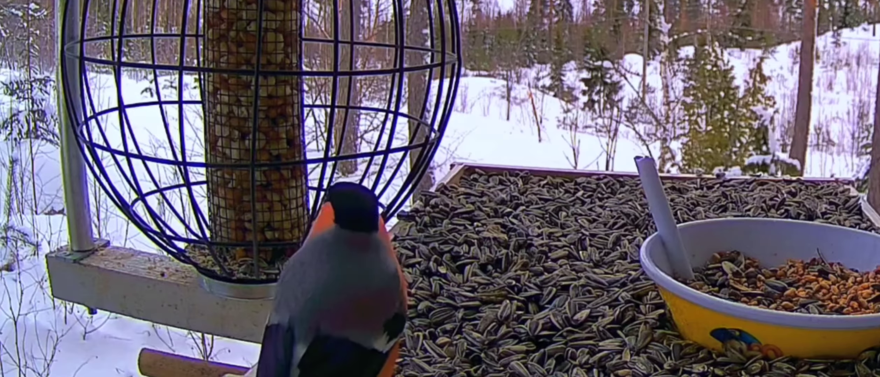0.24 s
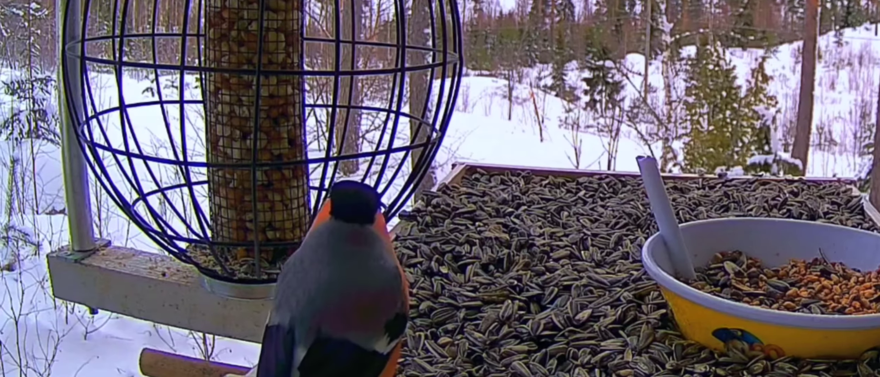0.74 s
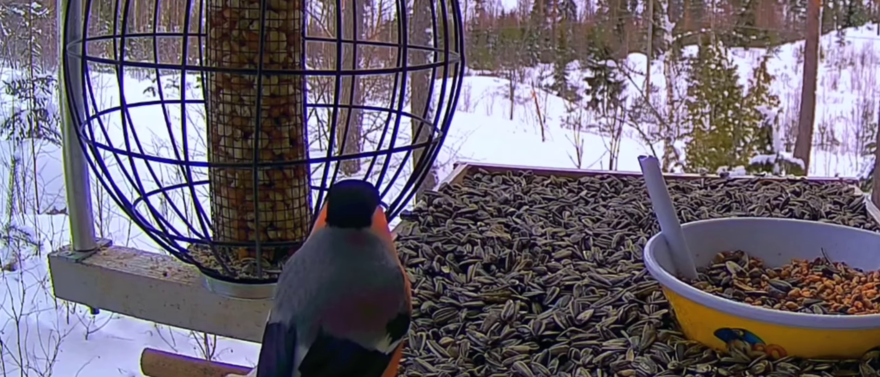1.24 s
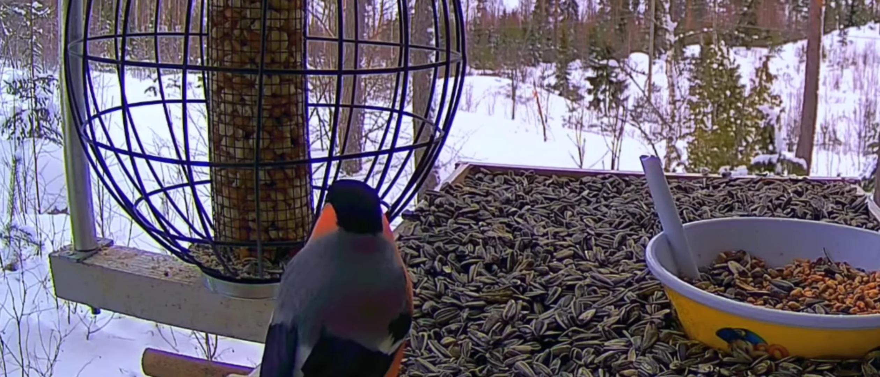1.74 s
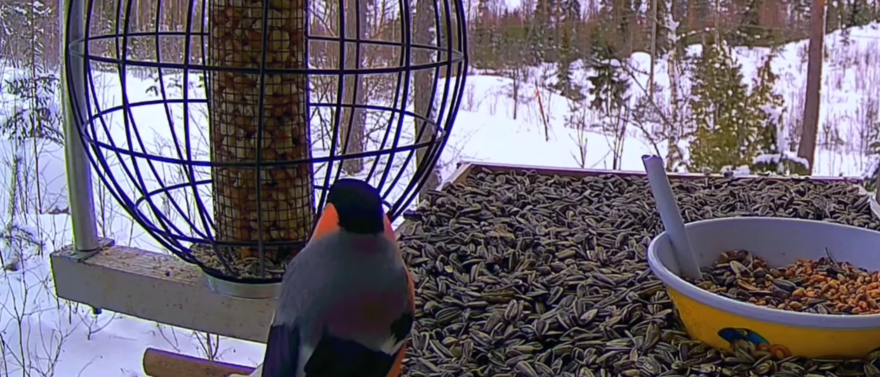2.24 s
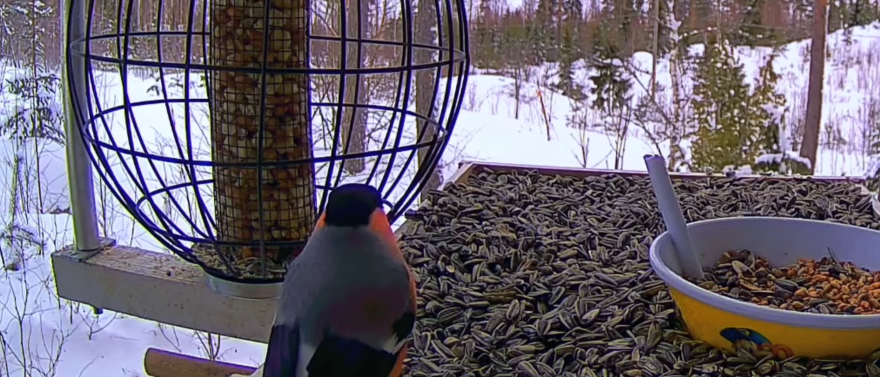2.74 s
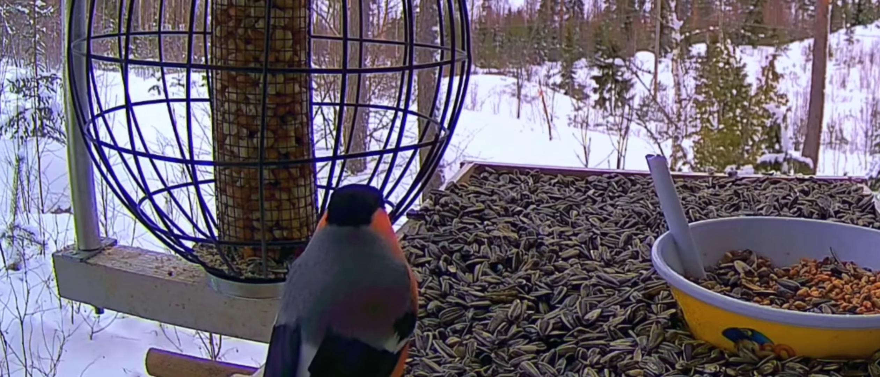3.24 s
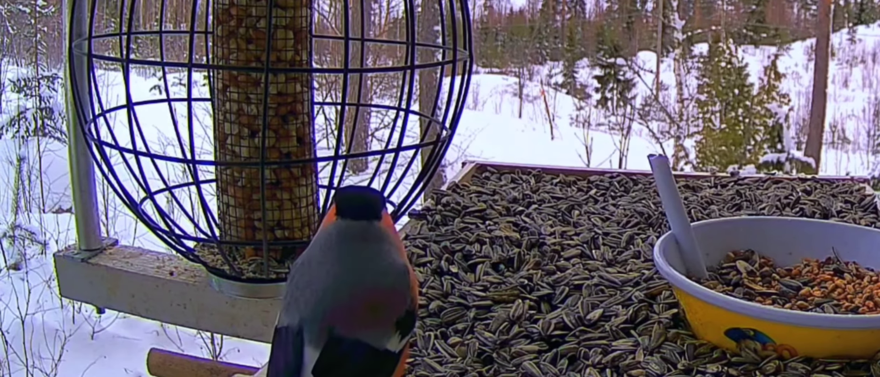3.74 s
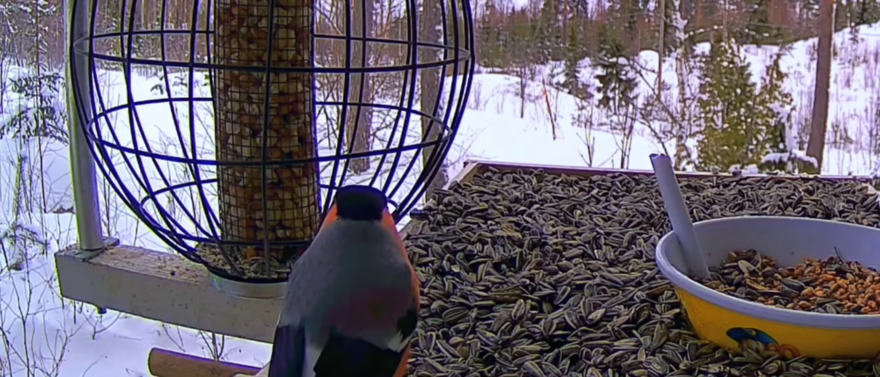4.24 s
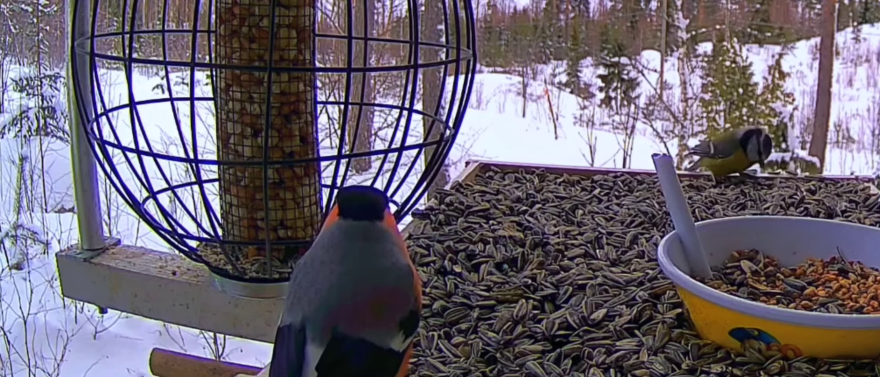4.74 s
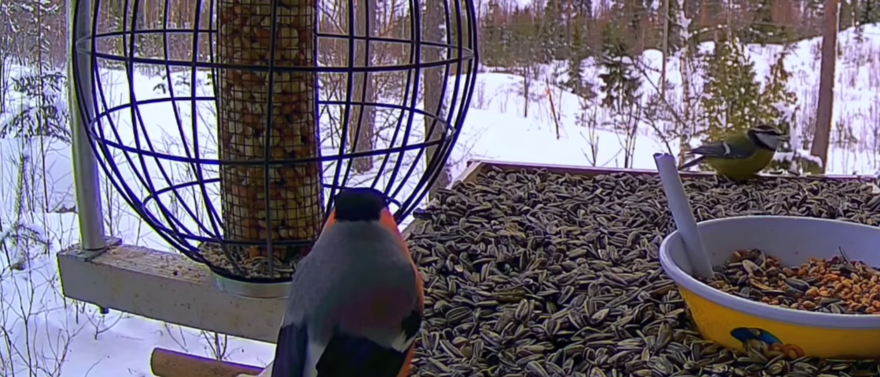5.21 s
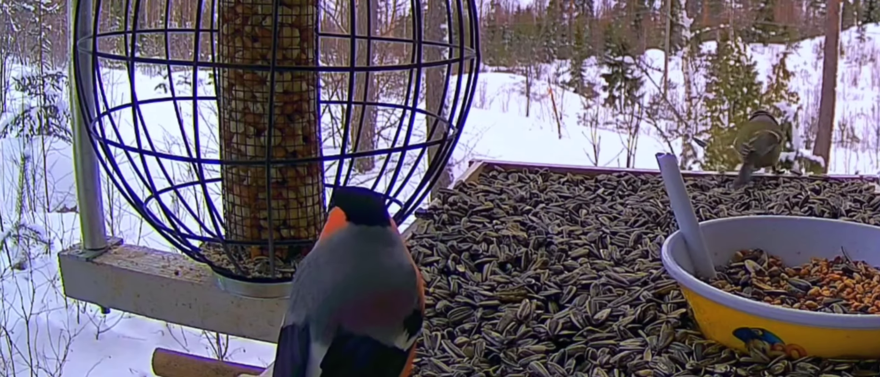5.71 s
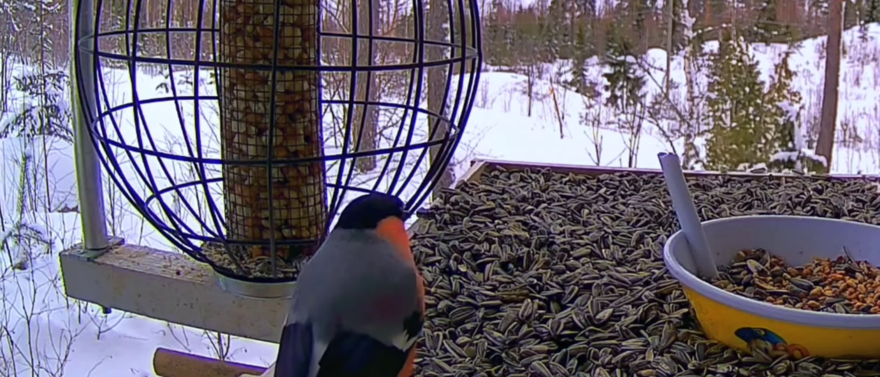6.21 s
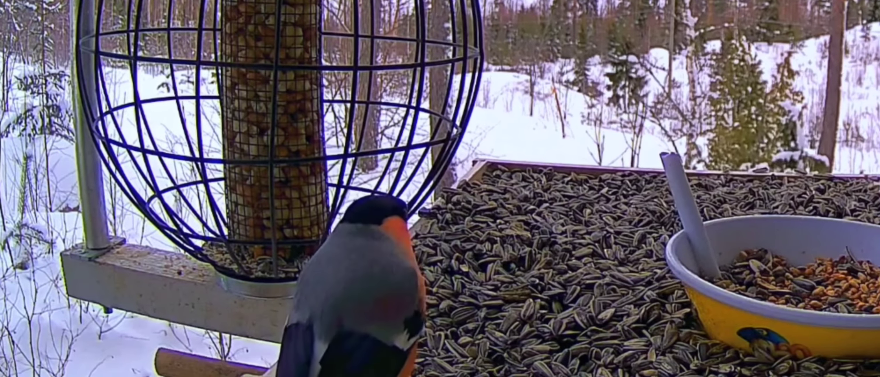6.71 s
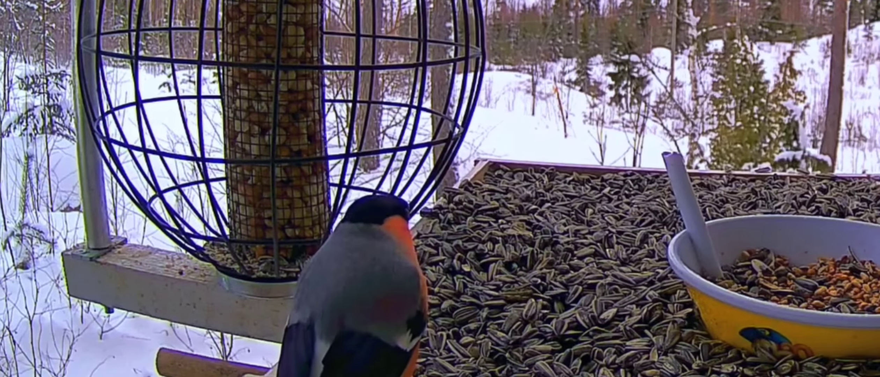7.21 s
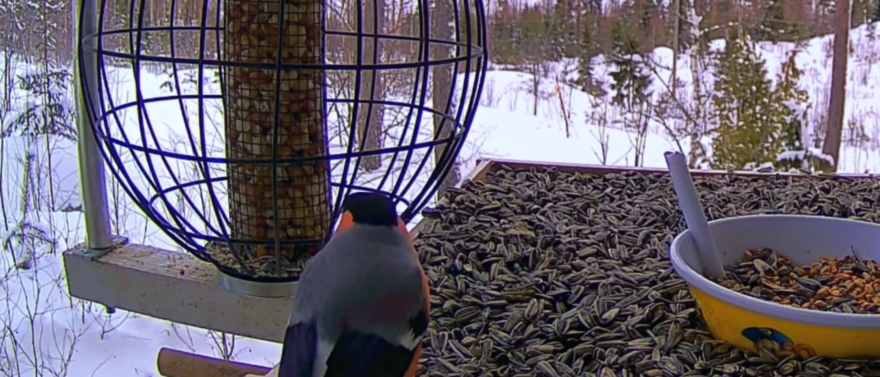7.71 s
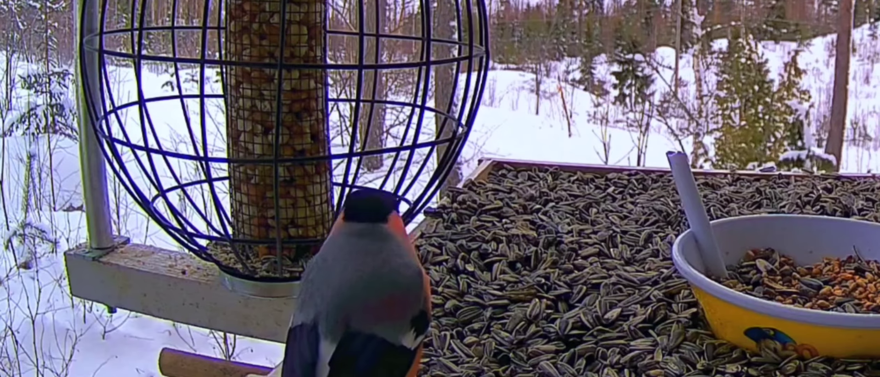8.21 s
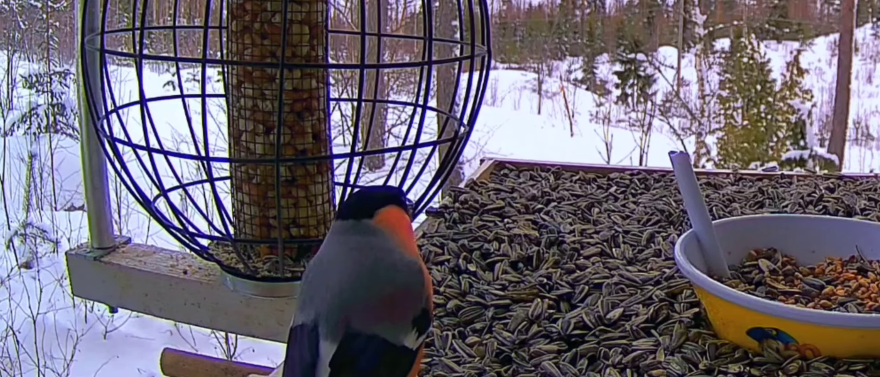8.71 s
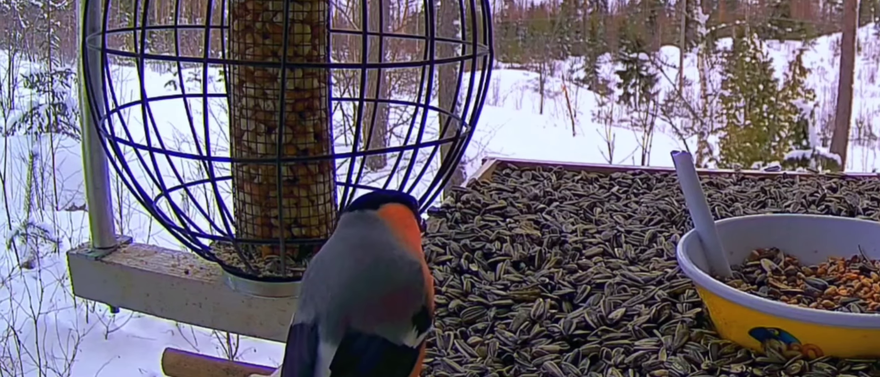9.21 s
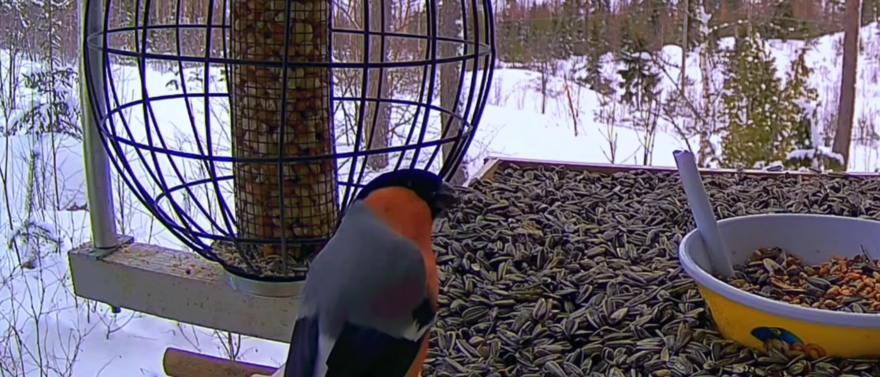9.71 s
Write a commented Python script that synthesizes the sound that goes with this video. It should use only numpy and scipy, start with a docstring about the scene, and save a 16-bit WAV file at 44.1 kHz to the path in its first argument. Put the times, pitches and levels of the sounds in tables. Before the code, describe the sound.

Close at a winter feeding tray, a burst of wing flutter fades into dry seed cracks and tiny ticks. Around three seconds a bird lands with rustling husks and a thin metallic rattle of the wire cage. Sharp snaps follow, another bird scuffs in at five seconds and flutters away after six. Brief high peeps dot the quiet air, heard by a boxy outdoor microphone.

```python
"""Wings flutter over a quiet floor of air and a far, wavering hum, then a beak cracks seeds.
Small birds at a winter feeding tray call, land, stir the husks, knock the wire cage and flutter off,
heard by a boxed-in outdoor microphone. Cracks, wings, husks and air are shaped noise, calls are
gliding sines and the cage is a set of decaying sines; a soft echo follows cracks, calls and cage."""
import sys
import numpy as np
from scipy import signal
from scipy.fft import rfft, irfft, next_fast_len
from scipy.io import wavfile
from scipy.ndimage import uniform_filter1d

SR = 44100
rng = np.random.default_rng(int(sys.argv[2]) if len(sys.argv) > 2 else 0)


def digitize_waveform(pressure):
    """Quantize a signal to 16-bit integers and store it at the path in sys.argv[1].

    Rows of a 2-D input are taken as channels; values are limited to [-1, 1].
    """
    field = np.atleast_2d(pressure).T
    bounded = np.clip(field, -1, 1)
    quanta = np.round(bounded * 32767).astype(np.int16)
    wavfile.write(sys.argv[1], SR, quanta)


N = 438794

# Spectrum of air pushed by wings. Each row: frequency in Hz, relative density in dB per Hz.
WING_SPECTRUM = [(71, -44), (120, -7), (150, -7), (200, -11), (307, -10), (418, 2.5), (494, -3.5),
                 (905, -3.5), (1060, -4.5), (1310, -1.5), (1720, -17.5), (2600, -8.5), (3380, -41),
                 (5720, -120)]
# Spectrum of rustling husks. Each row: frequency in Hz, relative density in dB per Hz.
HUSK_SPECTRUM = [(590, -36), (1000, -76), (1300, 3.5), (1600, -23.5), (2250, -7), (2890, -13), (3150, -3),
                 (4080, -12), (4450, 7.5), (6180, -25.5), (7140, -6), (8090, -14.5), (8410, -61),
                 (9170, -24), (10000, -43), (13000, -57), (22000, -120)]


def amp(db):
    """Turns dB into gain."""
    return 10 ** (np.asarray(db) / 20)


def evened(x):
    """Scales to rms 1."""
    return x / np.sqrt(np.mean(x ** 2) + 1e-20)


def curve(rows):
    """Draws the columns of a time table, sample by sample."""
    s, *columns = np.transpose(rows)
    return [np.interp(np.arange(N) / SR, s, column) for column in columns]


def add(mix, s, sound):
    """Mixes a sound in at s seconds."""
    part = mix[round(s * SR):][:len(sound)]
    part += sound[:len(part)]


def colour(x, points):
    """Shapes x by a spectrum, silent outside its ends."""
    size = next_fast_len(len(x))
    hz, db = np.transpose(points)
    bins_hz = np.fft.rfftfreq(size, 1 / SR)
    gain_db = np.interp(np.log(bins_hz + 1), np.log(hz + 1), db, -150, -150)
    return irfft(rfft(x, size) * amp(gain_db), size)[:len(x)]


def wander(per_s):
    """Drifts at random through per_s points a second, at rms 1."""
    steps = rng.standard_normal(int(N / SR * per_s) + 2)
    return evened(np.interp(np.arange(N) * per_s / SR, np.arange(len(steps)), steps))


def air():
    """Quiet air through the box's resonances, a flickering top hiss and three wavering low tones."""
    # Air below and above about 2.2 kHz. Each row: frequency in Hz, relative density in dB per Hz.
    low_spectrum = [(8.8, -41), (15, -10), (75, -3.5), (140, -3), (329, -3.5), (441, -3), (510, -36.5),
                    (616, -5.5), (955, -1), (1080, -15), (1310, 0.5), (1580, -22), (1750, -14), (1940, -3),
                    (2200, -12.5), (2860, -51), (4840, -120)]
    high_spectrum = [(1290, -49), (2200, -13), (2740, -3.5), (2970, -12.5), (3620, 0), (4510, 3),
                     (5140, -16), (5710, -8.5), (6150, -23.5), (6720, -4.5), (7120, -4.5), (8310, -27),
                     (9310, -5.5), (10500, -31), (15400, -34)]
    # A thin hiss at the very top comes and goes. Each row: start in seconds, end in seconds, level in dB.
    top_spells = [(0.7, 1.3, -67), (2.75, 3.36, -68), (4.7, 5.13, -67), (6.52, 6.75, -68),
                  (7.05, 7.61, -67), (8.1, 8.65, -68)]
    # Far hum near 97 Hz. Each row: time in seconds, level in dB before flicker.
    hum_levels = [(0.0, -72), (0.25, -62), (1.8, -70), (1.85, -60), (2.08, -68), (4.68, -65), (4.82, -79),
                  (5.04, -64), (6.12, -67), (6.18, -61), (7.26, -63), (7.32, -78), (7.4, -71), (8.29, -59),
                  (9.81, -61), (9.95, -71)]
    low_db, high_db = -57, -55.5
    top_rest_db, top_fade_s = -74, .05

    low = amp(low_db + 1.4 * wander(3)) * evened(colour(rng.standard_normal(N), low_spectrum))
    high = amp(high_db + 1.16 * wander(30)) * evened(colour(rng.standard_normal(N), high_spectrum))

    top_spectrum = [(9800, 1), (10300, -2), (11500, -8), (12500, -4), (15800, -7)]  # Hz, relative dB
    top = evened(colour(rng.standard_normal(N), top_spectrum))
    t = np.arange(N) / SR
    top_db = np.full(N, float(top_rest_db))
    for start, end, db in top_spells:
        presence = np.clip(np.minimum(t - start, end - t) / top_fade_s + .5, 0, 1)
        top_db += (db - top_rest_db) * presence
    out = low + high + amp(top_db + 2.3 * wander(40) + 1.4 * wander(130)) * top

    # each tone: level in dB, centre in Hz, rms pitch waver in Hz, rms flicker in dB
    tones = [(curve(hum_levels)[0], 96.5, 3.2, 4.0),
             (-68.5 + 1.6 * wander(4), 40.3, 1.5, 1.5),
             (-72.5 + 1.6 * wander(5), 193.5, 3.0, 3.0)]
    for db, hz, waver_hz, flicker_db in tones:
        turn = 2 * np.pi * np.cumsum(hz + waver_hz * wander(21)) / SR
        out += np.sqrt(2) * amp(db + flicker_db * wander(45)) * np.sin(turn)
    return out


def bustle():
    """Levels of wing and husk noise: the bouts rise and fade over a calm level, adding as power."""
    # Bouts of bustle; the one at 4.07 s is a brief swell of noise around a crack.
    # Each row: height in seconds, seconds to gain 10 dB, seconds to lose 10 dB,
    # level of wing-coloured noise in dB, level of husk-coloured noise in dB.
    bouts = [(0.01, .02, .75, -42.5, -48), (0.95, .15, .05, -50, -47), (1.07, .06, .5, -50, -48),
             (2.1, .2, .5, -57, -56), (2.74, .08, .06, -53, -43), (2.85, .04, .1, -53, -47),
             (2.99, .05, .08, -47, -40), (3.1, .03, .05, -45, -52), (3.17, .05, .2, -47, -49),
             (4.07, .05, .04, -65, -42), (4.22, .15, .1, -65, -53), (4.9, .1, .5, -53, -52),
             (4.93, .04, .12, -58, -43), (5.02, .06, .03, -56, -45), (5.75, .4, .6, -55.5, -53),
             (6.15, .04, .1, -54, -49), (6.34, .04, .45, -45, -47), (6.79, .15, .2, -51, -49),
             (7.67, .3, .4, -58, -56), (9.5, .6, .3, -65, -58)]
    calm_db = (-54.3, -67)  # wings, husks
    t = np.arange(0, N / SR + .01, .005)
    power = amp(calm_db)[:, None] ** 2
    for s, rise, fade, *db in bouts:
        drop_db = 10 * np.maximum((s - t) / rise, (t - s) / fade)
        power = power + amp(np.array(db)[:, None] - drop_db) ** 2
    return curve(np.c_[t, np.sqrt(power).T])


def stir():
    """Wings throb with each downstroke; husks rustle as dense small grains."""
    beats_per_s, grains_per_s = 28, 1800  # on average
    wings_gain, husks_gain = bustle()
    strokes = np.cumsum(beats_per_s * (1 + 0.1026 * wander(3))) / SR
    throb = amp(1.33 * np.cos(2 * np.pi * strokes))
    wings = evened(colour(rng.standard_normal(N), WING_SPECTRUM) * throb)

    sizes = amp(1.8 * np.minimum(rng.exponential(1, N), 5))
    grains = sizes * (rng.random(N) < grains_per_s / SR) * rng.standard_normal(N)
    # each grain scrapes for about a millisecond
    scrapes = signal.lfilter([1], [1, -.97], abs(grains)) * rng.standard_normal(N)
    husks = evened(colour(scrapes, HUSK_SPECTRUM))
    return wings_gain * wings + husks_gain * husks


def causal(gain):
    """Adds the phase that makes a filter ring only after it is struck."""
    log = np.log(np.concatenate([gain, gain[-2:0:-1]]) + 1e-4)
    return np.exp(log - 1j * signal.hilbert(log).imag)[:len(gain)]


def snaps():
    """Cracks, scuffs, random nibbles and bright tops as (s, peak dB of four parts, ms to the burst's height)."""
    # Beak cracks and claw taps. Each row: time in seconds, peak near 4.5 kHz in dB,
    # peak of the dull part in dB, peak near 7 kHz in dB.
    crack_hits = [(0.1328, -39, -27, -32), (0.142, -21.5, -26, -28), (0.2198, -32, -45, -52),
                  (0.2464, -31, -47, -46), (0.253, -22, -45, -27.5), (0.3275, -25, -27.5, -28),
                  (0.84, -34, -36, -52), (0.906, -38, -51, -38), (0.9148, -24, -42, -27),
                  (0.9249, -16.5, -32, -20.5), (0.9493, -23, -36, -20), (1.0862, -12, -10, -12.5),
                  (1.1843, -28, -40, -31), (1.1974, -35, -48, -32), (1.726, -32, -54, -32.5),
                  (2.0803, -23.5, -32, -29.5), (2.1487, -43, -50, -35), (2.1575, -30, -54, -33),
                  (2.2257, -37, -52, -39), (2.3088, -18, -34, -24), (2.556, -31, -45, -36),
                  (2.65, -22.5, -48, -25.5), (2.7174, 0.1, -13, -11), (2.8385, -32, -36, -35),
                  (2.8802, -27, -48, -60), (3.441, -30, -37, -35), (3.7904, -13.5, -30, -10),
                  (4.07, -1.2, -11, 0.1), (4.1925, -40, -37, -56), (4.2624, -31, -35, -36.5),
                  (4.3898, -34.5, -53, -57), (4.538, -33.5, -50, -38), (4.9104, -13, -35, -23),
                  (5.296, -24, -49, -28.5), (5.7502, -46, -33.5, -40), (5.806, -40, -36, -56),
                  (5.913, -42, -40, -50), (5.9737, -50, -54, -34), (6.0036, -33, -53, -36),
                  (6.0436, -28, -48, -30), (6.0813, -27, -39, -27), (6.1197, -41, -29.5, -39),
                  (6.1887, -40, -47, -50), (6.2373, -28, -34, -45), (6.581, -34, -32, -48),
                  (6.6083, -42, -32, -57), (6.8228, -22, -43, -27), (6.894, -14.5, -27, -24.5),
                  (6.9943, -32, -51, -55), (7.5804, -31.5, -42, -50), (7.636, -29, -47, -49),
                  (7.645, -39, -28.5, -36), (7.687, -33, -39, -37), (8.6617, -35, -48, -50),
                  (8.8435, -23, -54, -25), (8.9615, -25, -36, -31.5), (9.0807, -24, -23.5, -27.5),
                  (9.336, -36.5, -48, -49), (9.3484, -44, -40, -39), (9.431, -36, -54, -58),
                  (9.476, -30, -43, -31), (9.5027, -27, -36, -29)]
    # Feet scuffing among husks, longer and duller than a crack.
    # Each row: time in seconds, peak near 4.5 kHz in dB, peak of the dull part in dB.
    scuff_hits = [(2.948, -29, -33), (2.9807, -21, -25), (3.0233, -38, -31), (4.865, -41, -36),
                  (4.9065, -16.5, -21.5), (4.9174, -35, -37), (4.9274, -32, -37), (4.9456, -23, -24),
                  (4.9594, -34, -45), (4.98, -38, -37), (4.999, -24, -27), (5.0159, -25, -31),
                  (5.025, -33, -44), (6.147, -35.5, -35), (6.3199, -32, -33), (6.336, -28, -39),
                  (6.3471, -25, -25), (6.3644, -35, -47), (7.621, -36, -45), (7.708, -48, -40),
                  (9.3182, -39, -46)]
    # Very bright top part of some loud snaps. Each row: time in seconds, peak above 8.4 kHz in dB.
    top_hits = [(0.9249, -52), (1.0862, -46), (2.7174, -14), (3.7904, -45), (4.07, -13), (4.9065, -38),
                (4.9104, -27)]
    crack_ms, ms_per_dull_db, shortest_ms = .6, .013, .3  # a duller crack lasts longer
    scuff_ms, scuff_high_db = 2.1, -18  # the part near 7 kHz against the one near 4.5 kHz
    top_ms, mute_db = 1.2, -150
    nibbles_per_s, nibble_db, nibble_spread_db = 2.5, (-42, -48, -50), 4

    draws = rng.random((40, 4))
    nibble_s = np.cumsum(-np.log(1 - draws[:, 0])) / nibbles_per_s  # faint cracks fall at random
    nibbles = np.c_[nibble_s, nibble_db + nibble_spread_db * (2 * draws[:, 1:] - 1)]

    rows = []
    for row in [*crack_hits, *nibbles]:
        ms = max(crack_ms + ms_per_dull_db * (row[2] - row[1]), shortest_ms)
        rows.append((*row, mute_db, ms))
    for s, db, dull_db in scuff_hits:
        rows.append((s, db, dull_db, db + scuff_high_db, mute_db, scuff_ms))
    for s, db in top_hits:
        rows.append((s, mute_db, mute_db, mute_db, db, top_ms))
    return rows


def cracks():
    """A husk snaps: a short noisy burst, heard in four parts of the box's resonances."""
    # Resonances that colour a snap. Each row: frequency in Hz, relative density in dB per Hz.
    resonances = [(900, -34), (1300, -33), (2100, -24), (3300, -4), (4470, 8.5), (4850, 4), (5500, -9),
                  (6100, -4), (7080, 7.5), (7700, -2), (8400, -34), (9540, -11), (10500, -26), (12000, -24),
                  (14200, -21), (15800, -27)]
    # The four parts: near 4.5 kHz, dull, near 7 kHz, top. Each row: lower edge in Hz, upper edge in Hz.
    part_edges = [(3700, 5700), (2000, 3600), (5700, 8400), (8400, 20000)]
    evenness = .6  # how strongly each burst's spectrum is flattened, 0 to 1

    out, t = np.zeros(N), np.arange(1024) / SR
    hz = np.fft.rfftfreq(2048, 1 / SR) + 1
    body_hz, body_db = np.transpose(resonances)
    body = amp(np.interp(np.log(hz), np.log(body_hz), body_db))
    parts = [causal(body / (1 + (lo / hz) ** 8) / (1 + (hz / hi) ** 8)) for lo, hi in part_edges]

    rows = snaps()
    for (s, *parts_db, ms), noise in zip(rows, rng.standard_normal((len(rows), len(t)))):
        u = t * 1000 / ms
        envelope = u * np.exp(-u) + 0.019 * np.exp(-t / .003)  # crumbs follow the snap
        burst = rfft(noise * envelope, 2048)
        burst = burst / uniform_filter1d(abs(burst), size=15) ** evenness
        for db, ring in zip(parts_db, parts):
            part = irfft(burst * ring)[:len(t)]
            add(out, s, amp(db) * part / abs(signal.hilbert(part)).max())
    return out


def whistle(start, length, first_hz, last_hz, db, loudest, bend):
    """One glide that swells to its loudest point and dies away, as (s, Hz, dB) rows."""
    ends_db = -14  # both ends against the loudest point
    u = np.linspace(0, 1, 12)
    distance = np.interp(u, [0, loudest, 1], [1, 0, 1]) ** 1.5
    pitch = first_hz + (last_hz - first_hz) * u ** bend
    return np.c_[start + length * u, pitch, db + ends_db * distance]


def calls():
    """Near-sine whistles; a faint octave grows with loudness and is heard only from about 10 to 13 kHz."""
    # Near calls, one table a voice. Each row: time in seconds, pitch in Hz, level in dB.
    near_calls = [
        [(3.495, 6655, -60), (3.503, 7000, -41), (3.527, 6480, -50), (3.571, 6350, -57), (3.605, 5600, -45)],
        [(4.789, 7050, -30), (4.794, 7900, -31), (4.801, 8020, -33), (4.806, 7900, -22), (4.811, 7480, -23),
         (4.818, 6800, -33)],
        [(5.538, 4100, -28), (5.5395, 3400, -24), (5.543, 3200, -22), (5.549, 3440, -14.5),
         (5.556, 3410, -19.5), (5.561, 3770, -30)],
        [(5.538, 4500, -25), (5.543, 4470, -37), (5.546, 4750, -27), (5.55, 5200, -35), (5.555, 5700, -24.5),
         (5.559, 5760, -49)],
        [(6.667, 5600, -25), (6.672, 6370, -35), (6.68, 6470, -31), (6.69, 6100, -33), (6.712, 5580, -25),
         (6.731, 5230, -30), (6.744, 4700, -36)],
    ]
    # Far whistles that glide one way. Each row: start in seconds, length in seconds, first pitch in Hz,
    # last pitch in Hz, level in dB, share of the length at which it is loudest,
    # bend (1 is a straight glide, more holds the pitch and then drops).
    far_whistles = [(0.5, .015, 7914, 7000, -52, .55, 1), (1.545, .07, 6438, 5380, -58, .65, .9),
                    (1.56, .022, 8000, 6940, -50, .65, 3), (1.69, .1, 2650, 2725, -54, .35, .3),
                    (1.71, .06, 2240, 2220, -62, .2, 1), (2.228, .027, 7920, 7100, -45, .65, 4),
                    (2.721, .017, 8050, 6850, -27, .8, 4), (4.205, .07, 6480, 5530, -63, .75, 1),
                    (4.6, .1, 6640, 5930, -65, .15, 1), (5.665, .04, 5920, 5600, -60, .4, 1),
                    (7.498, .042, 5600, 4720, -52, .75, 1)]
    overtone_db = 3.5  # octave against the whistle, for a note at full scale

    out, air_db = np.zeros(N), 3.2 * wander(150)
    for rows in near_calls + [whistle(*row) for row in far_whistles]:
        s, hz, db = np.transpose(rows)
        t = np.arange(s[0], s[-1], 1 / SR)
        pitch, size = np.interp(t, s, hz), amp(np.interp(t, s, db))
        faintness = np.clip((-32 - db.max()) / 12, 0, 1)
        size *= amp(air_db[round(s[0] * SR):][:len(t)] * faintness)  # faint, far notes flicker
        turn = 2 * np.pi * np.cumsum(pitch) / SR
        octave_band = 1 / (1 + (pitch / 6800) ** 16) / (1 + (4900 / pitch) ** 12)
        octave = amp(overtone_db) * size * octave_band
        tone = np.sin(turn) + octave * np.sin(2 * turn)
        add(out, s[0], np.sqrt(2) * size * tone * signal.windows.tukey(len(t), .1))
    return out


def puffs():
    """Wing strokes are soft bursts of air, some deep, some sharp; an overload thump is one short push."""
    # Single wing strokes of birds landing. Each row: start in seconds, noise level below 700 Hz in dB,
    # noise level above in dB (both before the burst's envelope), time to the burst's height in ms.
    landings = [(2.986, -40, -31, 2.9), (3.028, -41, -35, 4.5), (4.91, -46, -29.5, 4.9),
                (4.947, -45, -44, 2.8), (4.999, -53, -34.5, 3.8), (6.133, -58, -36, 4.9),
                (6.301, -51, -41, 4.1), (6.348, -39, -26.5, 5.2)]
    # A short low thump as a very loud crack overloads the recorder.
    # Each row: start in seconds, level in dB (the push peaks about 4 dB lower).
    overload_thumps = [(4.07, -22)]
    # a bird flies off with even strokes that fade
    leave_s, leave_strokes, leave_per_s, leave_ms = 6.403, 9, 24.3, 4.5
    leave_db, leave_fade_db_per_s = (-36, -44), -14  # deep and sharp part of the first stroke

    out, t = np.zeros(N), np.arange(2048) / SR
    for s, db in overload_thumps:
        add(out, s, amp(db) * np.e * t / 0.0003 * np.exp(-t / 0.00018))

    rows = list(landings)
    for s in np.arange(leave_strokes) / leave_per_s:
        rows.append((leave_s + s, *np.add(leave_db, leave_fade_db_per_s * s), leave_ms))
    deep = [point for point in WING_SPECTRUM if point[0] < 700]
    sharp = [point for point in WING_SPECTRUM if point[0] >= 700]
    for (s, deep_db, sharp_db, ms), noise in zip(rows, rng.standard_normal((len(rows), len(t)))):
        u = t * 1000 / ms
        gust = amp(deep_db) * evened(colour(noise, deep))
        gust += amp(sharp_db) * evened(colour(noise, sharp))
        add(out, s, gust * u * np.exp(-u))
    return out


def cage():
    """A knock rings the long wires at once; the short ones chatter against each other for a moment."""
    # Wires of the cage. Each row: frequency in Hz, relative level in dB, time to fall 60 dB in seconds.
    wires = [(2020, -11.5, 0.03), (2340, -16, .02), (3418, -11, 0.025), (3628, -2, 0.31), (3712, -7, 0.14),
             (3805, -0.5, 0.055), (4080, -11, .04), (4250, -12, .03), (4250, -15, .04), (5794, -10, 0.036),
             (6350, -13, 0.068), (6528, -12.5, .07), (6912, -17, 0.06), (6722, -9, .085), (7000, -20, .04),
             (7750, -24, 0.09), (7650, -24, 0.061), (7500, -29, .05)]
    # Knocks on the cage. Each row: time in seconds, drive of the long wires in dB, drive of the short
    # wires in dB, level of the tick itself in dB, time to the height of the chatter in ms.
    knocks = [(3.047, -36, -57, -61, 1.5), (3.0635, -11, -56, -51, 1), (3.0685, -26, -51, -52, 1.5),
              (3.091, -19.5, -55, -58, 1.5), (3.103, -35, -11.5, -52, 3.3), (3.112, -21, -20.5, -48, 5.4),
              (3.132, -49, -33, -50, 3.3), (3.152, -51, -25, -42, 3.5), (3.172, -33, -40, -43, 1.4),
              (3.17563, -21, -16, -43, 2), (3.2, -34, -33, -51, 8.5)]
    t = np.arange(SR // 2) / SR
    rings = np.array([amp(db - 60 * t / t60) * np.sin(2 * np.pi * hz * t) for hz, db, t60 in wires])
    short = np.array(wires)[:, 0] > 5000
    long = rings[~short].sum(0) * (1 - np.exp(-(t / 0.0013) ** 2))  # softened onset

    out = np.zeros(N)
    noises = rng.standard_normal((len(knocks), short.sum() + 1, 4096))
    for (s, long_db, short_db, tick_db, ms), noise in zip(knocks, noises):
        u = t[:4096] * 1000 / ms
        chatter = noise * u * np.exp(-u)
        chatter /= np.linalg.norm(chatter, axis=1)[:, None]
        rattle = signal.fftconvolve(rings[short], chatter[1:], axes=1).sum(0)
        tick = evened(colour(chatter[0], HUSK_SPECTRUM)) * signal.windows.tukey(4096, .01)
        add(out, s, amp(long_db) * long)
        add(out, s, amp(short_db) * rattle)
        add(out, s, amp(tick_db) * tick)
    # the box is deaf near 8.4 kHz
    return signal.sosfilt(signal.butter(3, (7950, 9100), "bandstop", fs=SR, output="sos"), out)


def yard(x, t60, early_db, blur):
    """Tray, roof and trees scatter a sound back, duller; moving air blurs the echo."""
    t = np.arange(SR // 4) / SR
    decay = amp(-60 * t / t60) + amp(early_db - 60 * t / 0.021)  # long tail and early scatter
    tail = rng.standard_normal(len(t)) * decay * (t > .002)
    tail = signal.lfilter(*signal.butter(4, 9000, fs=SR), tail)
    echo = signal.fftconvolve(x, tail / np.linalg.norm(tail))[:N]
    return echo * (1 - blur + blur * wander(900))


def scene():
    """All sources at one microphone."""
    echo_db = (-18, -21.5, -17)  # cracks, calls, cage
    near, far, wires = cracks(), calls(), cage()
    echoes = amp(echo_db) @ [yard(near, 0.19, 5.5, blur=0.13),
                             yard(far, 0.28, 0, blur=1.0),
                             yard(wires, 0.2, 0, blur=.15)]
    return (near + far + wires + echoes + puffs() + stir() + air())[None]


def record(dry):
    """Full scale limits the loudest crack; then the band limit."""
    edge_hz = 15720
    lowpass = signal.firwin(1023, edge_hz, window=("kaiser", 9), fs=SR)
    return signal.oaconvolve(np.clip(dry, -1, 1), lowpass[None], "same")


dry = scene()
out = record(dry)
digitize_waveform(out)
```